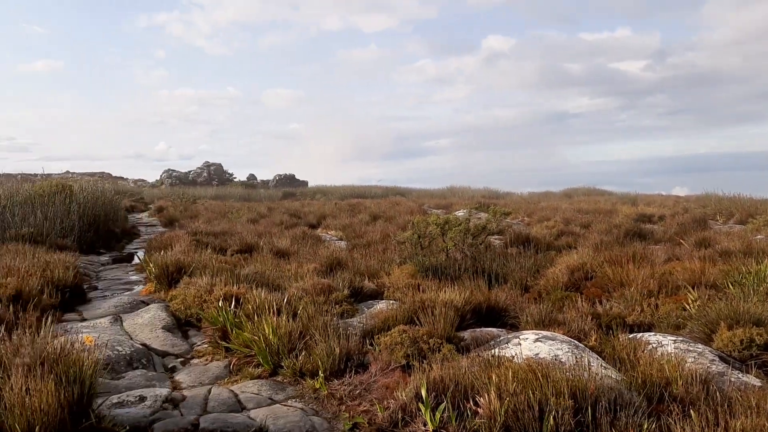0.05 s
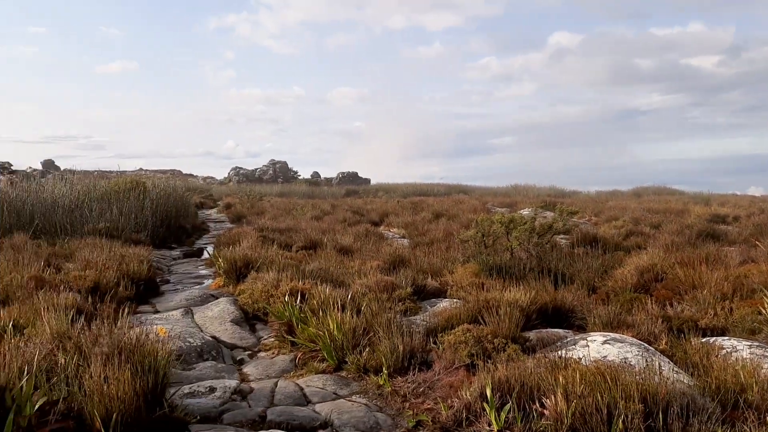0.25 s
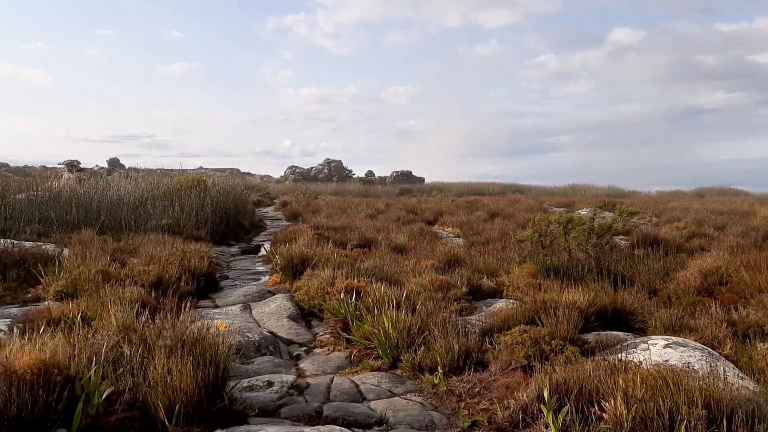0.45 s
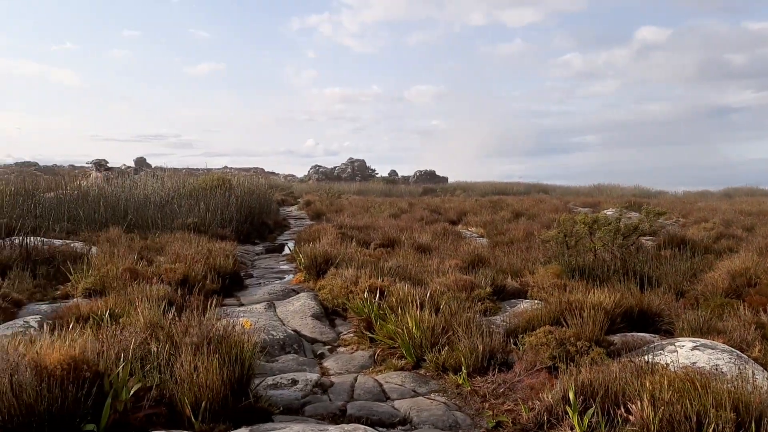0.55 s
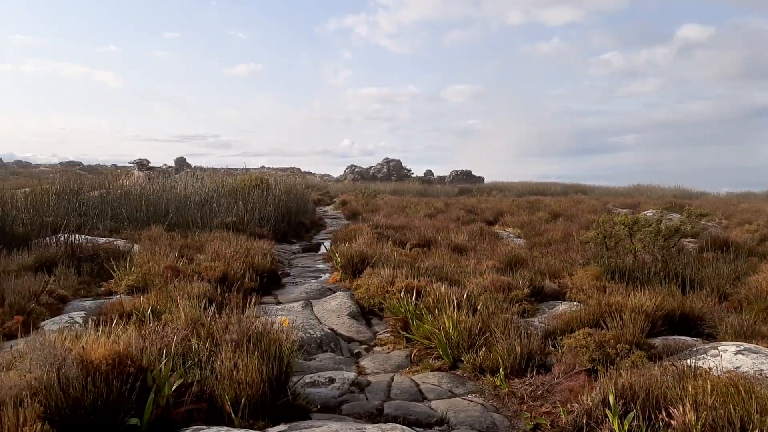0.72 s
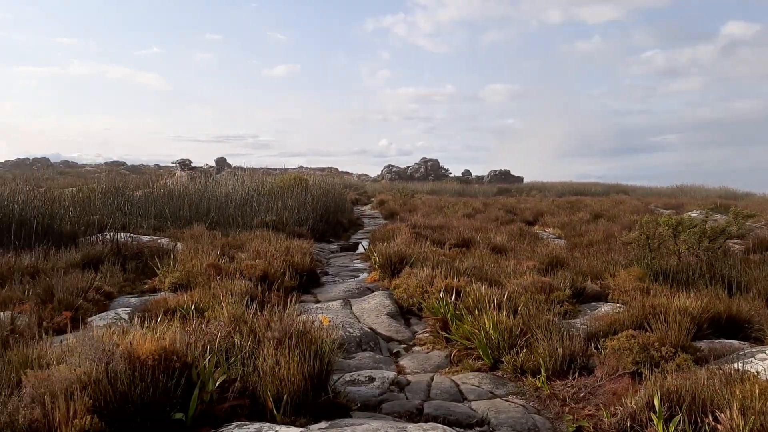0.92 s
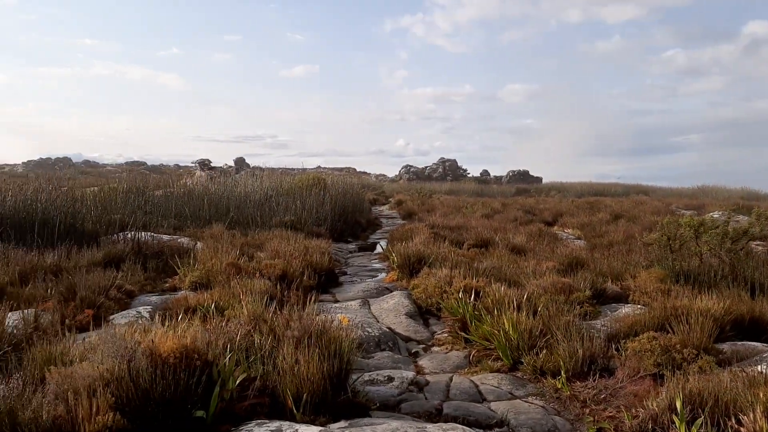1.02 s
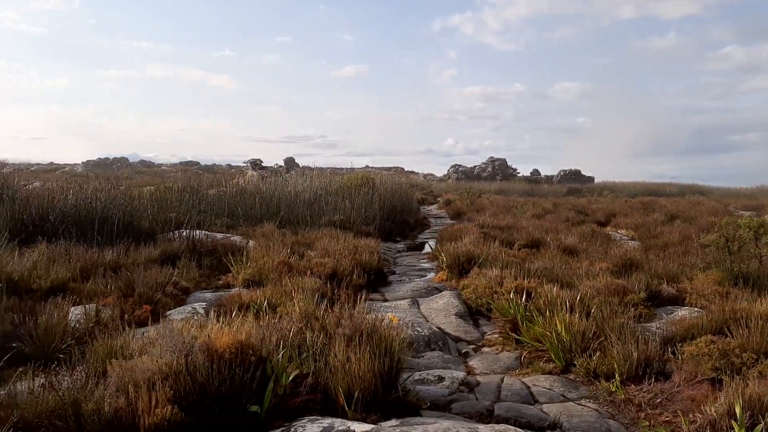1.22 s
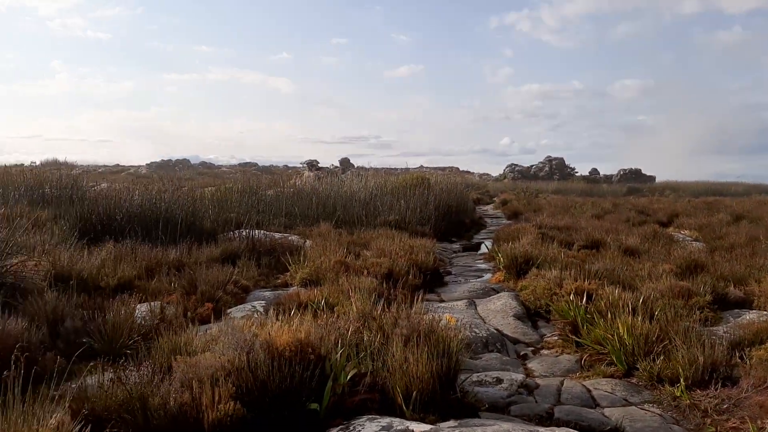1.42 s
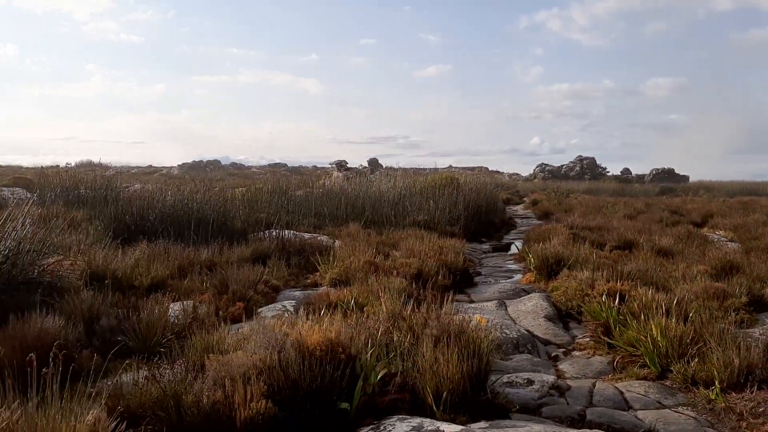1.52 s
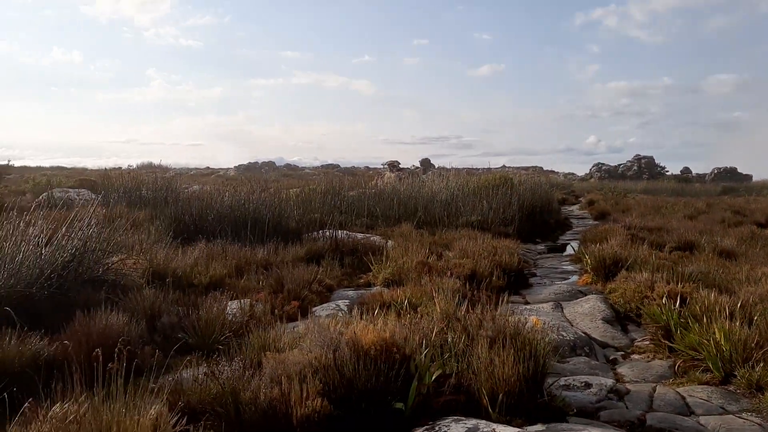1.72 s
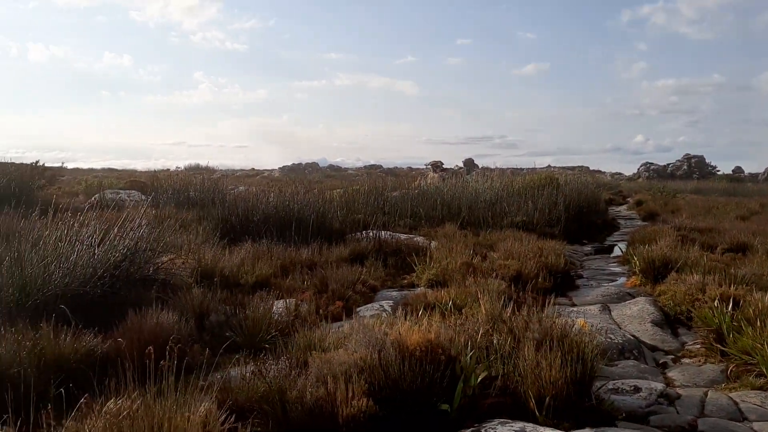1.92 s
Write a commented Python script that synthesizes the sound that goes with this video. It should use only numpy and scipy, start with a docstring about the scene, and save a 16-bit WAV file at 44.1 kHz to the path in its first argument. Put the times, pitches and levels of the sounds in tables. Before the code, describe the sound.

On open heathland, nearby small frogs repeat bright, chirping pips, some ending in clicking rattles, with softer trills and a faint chorus behind them. Light gusts buffet the microphone, strongest near the end, over a thin hiss.

```python
"""Quick runs of pure, high pips come from small frogs on an open heath. Each pip is a tone radiated
by the vocal sac; some runs end in a held note and a rattle of clicks that ring the sac briefly.
Farther frogs trill, rocks and reeds scatter a short echo, and a distant chorus ticks all around.
Light wind buffets the microphone with a low rumble over a faint hiss."""
import sys
import numpy as np
from scipy import signal
from scipy.fft import rfft, irfft
from scipy.io import wavfile
from scipy.ndimage import map_coordinates

SR = 44100
rng = np.random.default_rng(int(sys.argv[2]) if len(sys.argv) > 2 else 0)


def transcribe(signal):
    """Save signal, clipped to [-1, 1], as a 16-bit WAV file at the path in sys.argv[1]."""
    frames = np.atleast_2d(signal).T
    limited = np.clip(frames, -1, 1)
    pcm = np.round(limited * 32767).astype(np.int16)
    wavfile.write(sys.argv[1], SR, pcm)


N = 85995

# spectra of the open air, the hiss and the wind (frequency [Hz], relative spectral density [dB])
AIR_SPECTRUM = [(30, 1), (200, -1.5), (400, -2.5), (900, -7), (1500, 2.5), (2400, -7.5), (3400, -2),
                (4300, -8), (5200, -10), (6300, -22), (8000, -43.5), (16000, -49)]
HISS_SPECTRUM = [(30, -5), (5000, -22.5), (7500, -13.5), (9700, -16), (10500, -8), (12500, -1.5),
                 (14500, -1), (16000, -3)]
WIND_SPECTRUM = [(20, -23), (35, -17), (52, 5), (72, -0.5), (100, -5.5), (150, -16), (220, -26.5),
                 (400, -44), (900, -83)]
# slow swell of the air and hiss (time [s], gain [dB])
BACKGROUND_SWELL = [(0, -2), (.3, -1.5), (.45, 2.5), (.65, -2.5), (.85, 2), (1.1, 0.5), (1.45, 4.5),
                    (1.67, 4.5), (1.8, -1), (1.95, -9)]
# gusts on the microphone (time [s], relative level [dB])
WIND_GUSTS = [(0.0, -71.5), (0.178, -58.5), (0.248, -64.5), (0.624, -67.5), (0.64, -54), (0.802, -49.5),
              (0.868, -62.5), (0.912, -56), (0.95, -65.5), (1.194, -62.5), (1.232, -55.5), (1.422, -64.5),
              (1.438, -49.5), (1.504, -39.5), (1.548, -61.5), (1.71, -70.5), (1.818, -60), (1.95, -75)]
# farther frogs' trills (first onset [s], last onset [s], first pitch [Hz], last pitch [Hz],
# first level [dB], last level [dB], left minus right [dB])
FAR_TRILLS = [(0.093, 0.146, 3540, 3526, -42.5, -36.5, -9), (.513, .575, 3480, 3517, -34.5, -36, -12),
              (.595, 0.634, 3496, 3505, -39.5, -41.5, -4), (0.652, 0.723, 3627, 3776, -45.5, -47.5, -13.5),
              (0.882, .942, 3280, 3397, -46, -41, -15), (0.968, 1.031, 3617, 3545, -40, -42, -8),
              (1.166, 1.221, 3500, 3460, -45.5, -51.5, -9), (1.242, 1.275, 3400, 3480, -48.5, -53.5, 7),
              (1.347, 1.384, 3680, 3670, -45.5, -42.5, -18.5), (1.688, 1.743, 3450, 3310, -42, -48.5, -5),
              (1.782, 1.851, 3400, 3473, -40, -44.5, -12), (1.887, 1.928, 3352, 3420, -42.5, -46, -11)]
# near frogs' pips (onset [s], pitch [Hz], peak level [dB], length [s], left minus right [dB])
NEAR_PIPS = [(0.2086, 3366, -24.5, 0.0058, -12), (0.2234, 3380, -24, 0.0072, -12),
             (.249, 3404, -24.5, 0.011, -11.5), (0.267, 3358, -31.5, 0.0068, -9),
             (0.3443, 3267, -25.5, 0.0089, -5.5), (0.371, 3285, -24.5, 0.027, -10),
             (0.4, 3260, -30, .036, -7), (.758, 3360, -33, 0.0068, -1.5), (0.7736, 3404, -21, 0.0088, -6),
             (.802, 3426, -20, 0.0086, -5), (0.813, 3345, -35.5, 0.009, -3.5),
             (0.8267, 3429, -20, 0.014, -6.5), (0.847, 3436, -28.5, 0.013, -6.5),
             (0.8606, 3330, -29, 0.0098, -2.5), (1.0946, 3577, -30, 0.0067, -8.5),
             (1.111, 3570, -31.5, 0.011, -6), (1.123, 3536, -37.5, 0.027, -9),
             (1.154, 3580, -37.5, 0.0076, -9), (1.396, 3662, -27, 0.0088, -10),
             (1.4117, 3670, -27, 0.016, -7.5), (1.445, 3324, -37.5, 0.011, 0.5),
             (1.469, 3358, -34.5, 0.0064, -1), (1.4813, 3263, -37.5, 0.012, -5),
             (1.502, 3320, -39.5, 0.0085, -7), (1.601, 3530, -34, 0.0091, -6),
             (1.6174, 3560, -33.5, 0.017, -3.5), (1.636, 3606, -33, 0.017, -10),
             (1.656, 3545, -35.5, 0.015, -10), (1.666, 3500, -35, 0.0098, -5)]
# clicks of the rattles (onset [s], pitch [Hz], peak level [dB], left minus right [dB])
RATTLE_CLICKS = [(0.4007, 3420, -29.5, -10.5), (.4265, 3600, -33, -8), (0.4462, 3510, -29.5, -11),
                 (.451, 3620, -41, 0), (.457, 3930, -34.5, -6), (.4645, 3490, -30.5, -9.5),
                 (.4675, 3450, -32, -8.5), (.4715, 3630, -37, -6.5), (.483, 3430, -30, -13),
                 (.4865, 3330, -34, -8), (.501, 3500, -34.5, -11.5), (1.4135, 3440, -36, 7),
                 (1.423, 3350, -35, -14), (1.427, 3390, -35, -20), (1.4313, 3280, -41, 1),
                 (1.6265, 3330, -37, -1), (1.645, 3440, -32.5, -10)]

AIR_DB, HISS_DB, WIND_GAIN_DB = -69, -73.5, 3
CHORUS_PER_S, CHORUS_HZ, CHORUS_SPREAD_HZ, CHORUS_PIP_S = 300, 3424, 160, 0.0053
CHORUS_DB, CHORUS_SPREAD_DB, CHORUS_PAN_DB = -53, 0.5, -10.5
ECHO_DB, ECHO_T60_S = -9.5, 0.25
TRILL_PERIOD_S, TRILL_PIP_S, TRILL_SPREAD_DB = 0.019, 0.0094, 1.9
PIP_ATTACK_S, PIP_RELEASE_S, PIP_SAG_S, PIP_SUSTAIN = 0.0028, 0.005, 0.009, 0.39
SCOOP_DEPTH, SCOOP_S, WAVER_DEPTH, OCTAVE_DB = 0.034, 0.001, 0.0048, -51.5
CLICK_RISE_S, CLICK_DECAY_S = 0.0011, 0.0048
RIGHT_LAG_S = 0.00007  # near and farther calls reach the right microphone port this much later
CUTOFF_HZ = 15800


def undb(db):
    """Amplitude ratio: a factor of ten for every 20 dB."""
    return 10 ** (np.asarray(db) / 20)


def pan_gains(pan_db):
    """Constant-power panning: left and right gains whose squares sum to one."""
    gains = undb(np.array([[pan_db], [-pan_db]]) / 2)
    return gains / np.sqrt(np.sum(gains ** 2))


def add(out, start, sound):
    """Superposition: a stereo sound adds to the mix from its onset."""
    i = max(int(start * SR), 0)
    n = min(sound.shape[1], N - i)
    if n > 0:
        out[:, i:i + n] += sound[:, :n]


def curve(rows):
    """Linear interpolation through (time [s], value) rows."""
    return np.interp(np.arange(N) / SR, *np.array(rows).T)


def ease(x):
    """Raised-cosine step from 0 to 1."""
    return np.sin(np.clip(x, 0, 1) * np.pi / 2) ** 2


def noise(spectrum, correlation):
    """Spectral shaping: noise of unit rms, its left-right correlation set by mid and side weights."""
    hz, db = np.array(spectrum).T
    bin_hz = np.maximum(np.arange(N // 2 + 1) * SR / N, 1)
    shape = undb(np.interp(np.log(bin_hz), np.log(hz), db))
    mid, side = irfft(rfft(rng.standard_normal((2, N))) * shape, N)
    stereo = np.sqrt(1 + correlation) * mid + np.sqrt(1 - correlation) * side * np.array([[1], [-1]])
    return stereo / stereo.std()


def background():
    """Broadband ambient noise: soft open air and a thin, high hiss swell together."""
    air = noise(AIR_SPECTRUM, correlation=0.6) * undb(AIR_DB) * pan_gains(-8.5) * np.sqrt(2)
    hiss = noise(HISS_SPECTRUM, correlation=0) * undb(HISS_DB)
    return (air + hiss) * undb(curve(BACKGROUND_SWELL))


def wind():
    """Pressure fluctuations from gusts at the microphone ports make a low rumble."""
    gusts = undb(curve(WIND_GUSTS) + WIND_GAIN_DB)
    return noise(WIND_SPECTRUM, correlation=0.23) * gusts * pan_gains(-7) * np.sqrt(2)


def chorus():
    """Incoherent summation: pips of many distant frogs, random in time, pitch, level and place."""
    out = np.zeros((2, N))
    deviations = rng.standard_normal((int(CHORUS_PER_S * N / SR), 4))
    for k, (late, pitch, level, place) in enumerate(deviations):
        gain = undb(CHORUS_DB + CHORUS_SPREAD_DB * level) * pan_gains(CHORUS_PAN_DB + 4 * place)
        hz = CHORUS_HZ + CHORUS_SPREAD_HZ * pitch
        pair = np.array([pip(hz, CHORUS_PIP_S), pip(hz, CHORUS_PIP_S)])  # unrelated phase on each side
        add(out, abs(k + late) / CHORUS_PER_S, gain * pair)
    return out


def echoes(calls):
    """Diffuse scattering from rocks and reeds: convolution with exponentially decaying noise."""
    t = np.arange(SR // 2) / SR
    tail = rng.standard_normal((2, len(t))) * np.exp(-np.log(1000) * t / ECHO_T60_S)
    tail /= np.sqrt(np.sum(tail ** 2, axis=1, keepdims=True))
    return undb(ECHO_DB) * signal.fftconvolve(calls, tail, axes=1)[:, :N]


def far_frogs():
    """Periodic pulse trains: evenly spaced soft pips form trills that glide in pitch and level."""
    out = np.zeros((2, N))
    for first, last, first_hz, last_hz, first_db, last_db, pan in FAR_TRILLS:
        count = round((last - first) / TRILL_PERIOD_S) + 1
        for progress in np.linspace(0, 1, count):
            start = first + progress * (last - first)
            hz = first_hz + progress * (last_hz - first_hz)
            db = first_db + progress * (last_db - first_db) + TRILL_SPREAD_DB * rng.standard_normal()
            add(out, start, undb(db) * pan_gains(pan) * pip(hz, TRILL_PIP_S))
    return out


def click(hz):
    """Damped resonance: a click sets the vocal sac ringing, and the ring decays exponentially."""
    t = np.arange(SR // 20) / SR
    envelope = ease(t / CLICK_RISE_S) * np.exp(-np.maximum(t - CLICK_RISE_S, 0) / CLICK_DECAY_S)
    return envelope * np.sin(2 * np.pi * (hz * t + rng.random()))


def pip(hz, length):
    """Radiation from the vocal sac: a nearly pure tone scoops up to pitch, swells, sags and stops."""
    t = np.arange(int((length + PIP_RELEASE_S / 2) * SR)) / SR
    gate = ease(t / PIP_ATTACK_S) * ease((length - t) / PIP_RELEASE_S + 0.5)
    sag = PIP_SUSTAIN + (1 - PIP_SUSTAIN) * np.exp(-np.maximum(t - PIP_ATTACK_S, 0) / PIP_SAG_S)
    waver = np.interp(t, np.linspace(0, length, 10), rng.standard_normal(10))
    pitch = hz * (1 - SCOOP_DEPTH * np.exp(-t / SCOOP_S) + WAVER_DEPTH * waver)
    phase = 2 * np.pi * (np.cumsum(pitch) / SR + rng.random())
    return gate * sag * (np.sin(phase) + undb(OCTAVE_DB) * np.sin(2 * phase))


def near_frogs():
    """Direct sound of the near frogs: loud pips and rattles, placed by left-right level difference."""
    out = np.zeros((2, N))
    for start, hz, db, length, pan in NEAR_PIPS:
        add(out, start, undb(db) * pan_gains(pan) * pip(hz, length))
    for start, hz, db, pan in RATTLE_CLICKS:
        add(out, start, undb(db) * pan_gains(pan) * click(hz))
    return out


def scene():
    """Superposition at two microphone ports: wind and air, calls, their echoes and the chorus."""
    ambience = wind() + background()
    left, right = near_frogs() + far_frogs()
    delayed_right = map_coordinates(right, [np.arange(N) - RIGHT_LAG_S * SR], mode="nearest")
    calls = np.array([left, delayed_right])
    return ambience + calls + echoes(calls) + chorus()


def record(dry):
    """Band limiting: a steep elliptic low-pass filter removes the highest treble."""
    return signal.sosfilt(signal.ellip(10, 0.1, 70, CUTOFF_HZ, fs=SR, output="sos"), dry)


dry = scene()
out = record(dry)
transcribe(out)
```